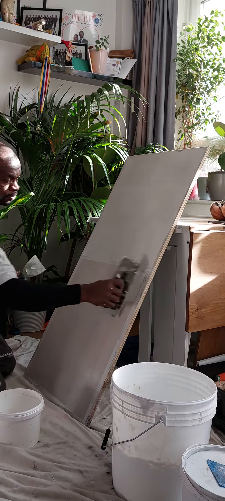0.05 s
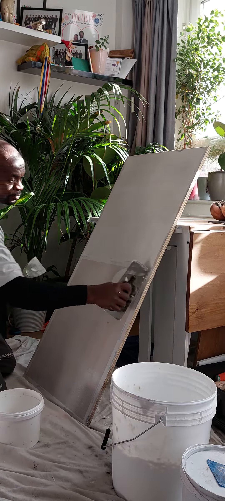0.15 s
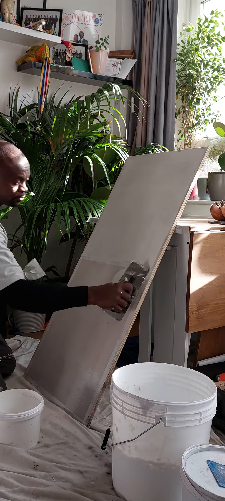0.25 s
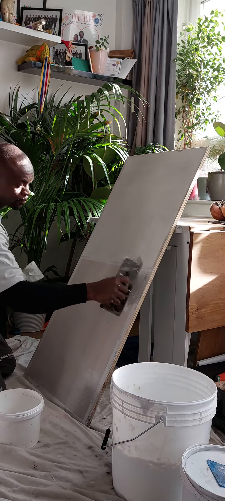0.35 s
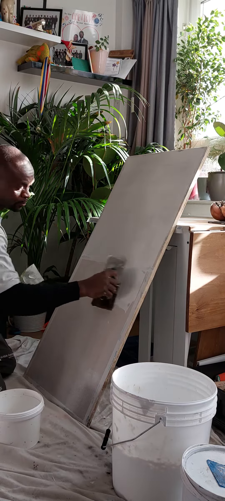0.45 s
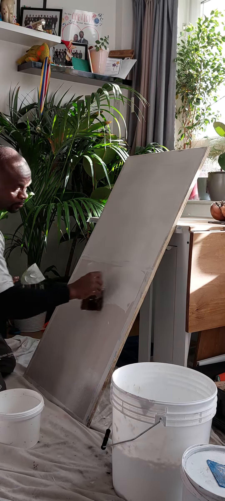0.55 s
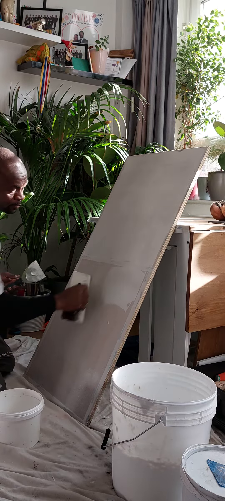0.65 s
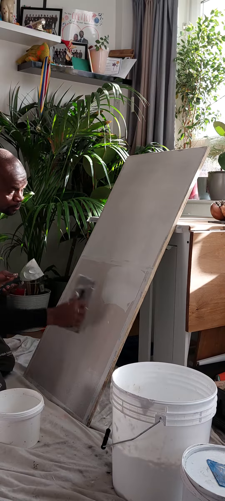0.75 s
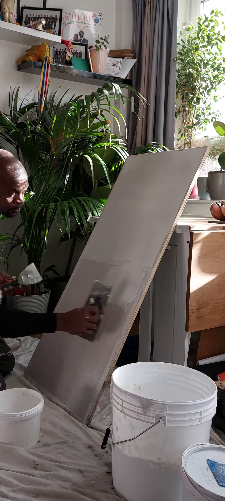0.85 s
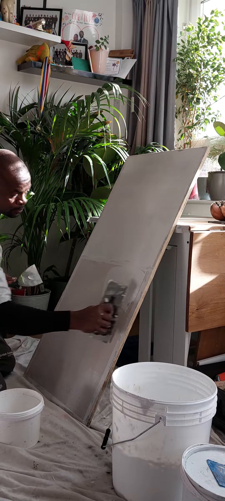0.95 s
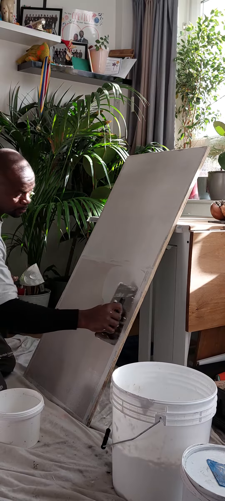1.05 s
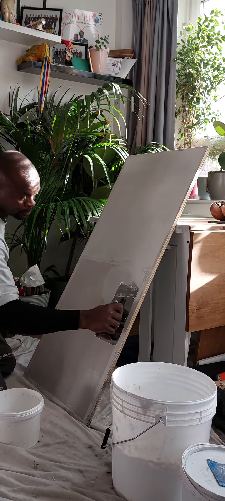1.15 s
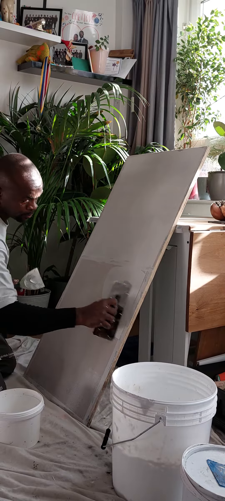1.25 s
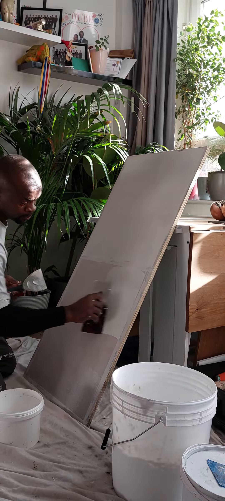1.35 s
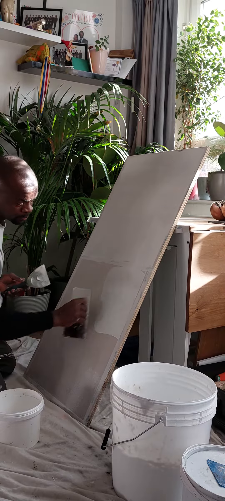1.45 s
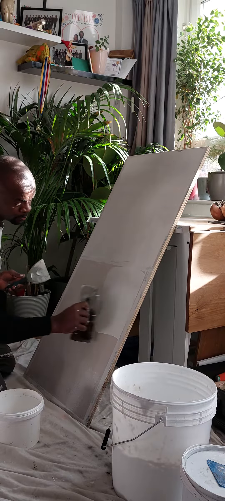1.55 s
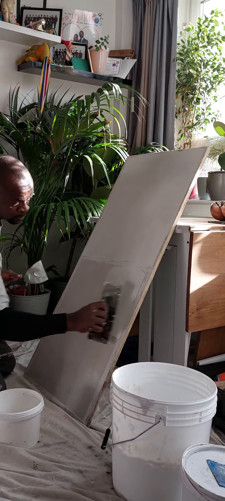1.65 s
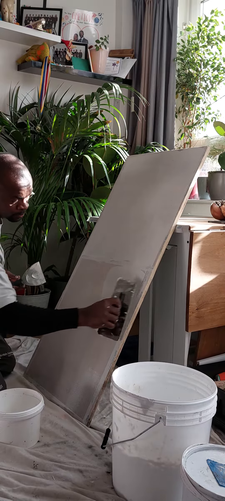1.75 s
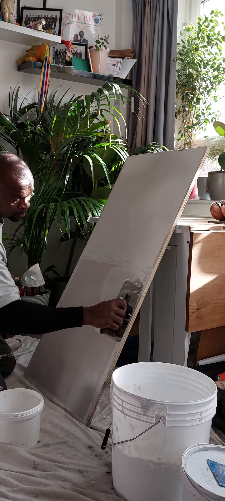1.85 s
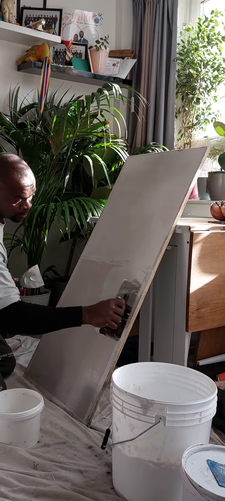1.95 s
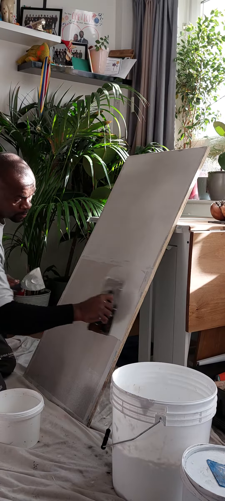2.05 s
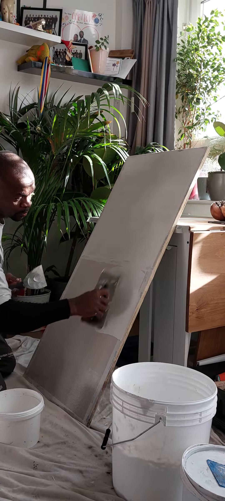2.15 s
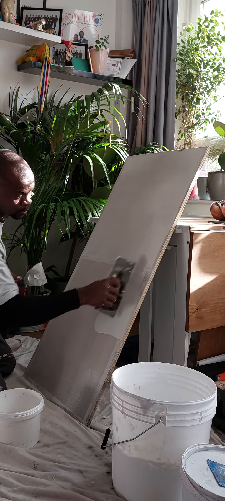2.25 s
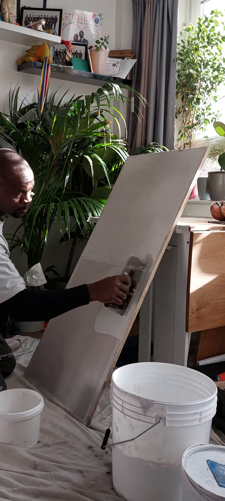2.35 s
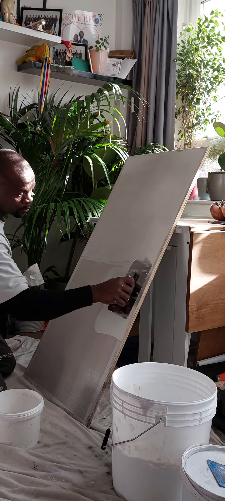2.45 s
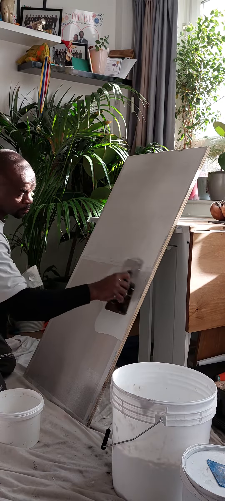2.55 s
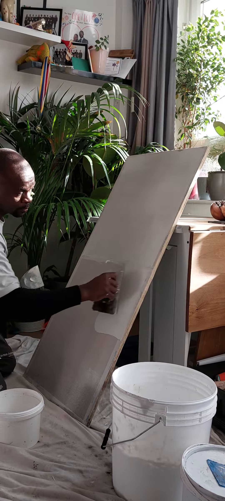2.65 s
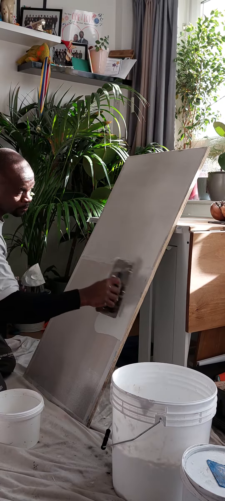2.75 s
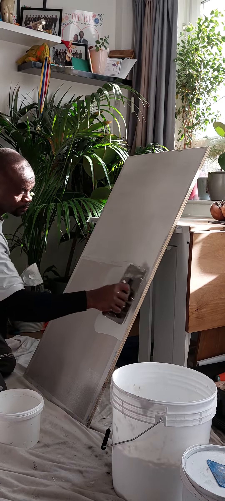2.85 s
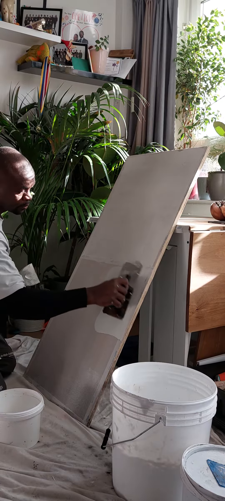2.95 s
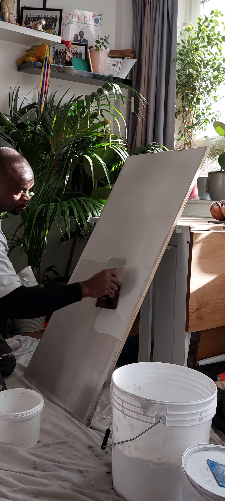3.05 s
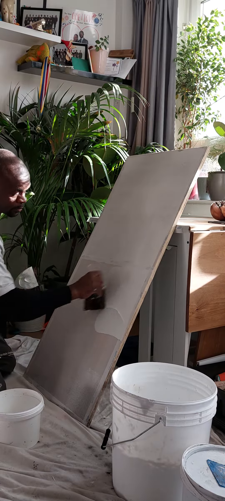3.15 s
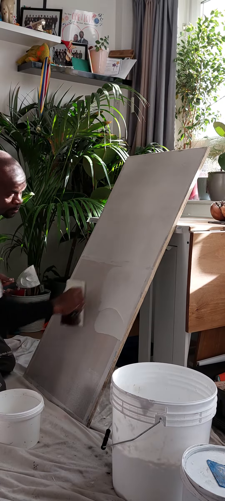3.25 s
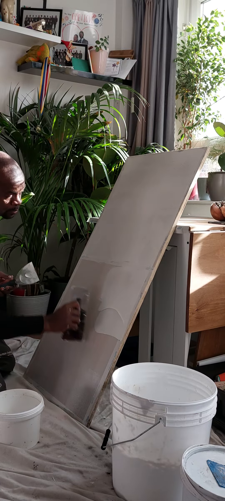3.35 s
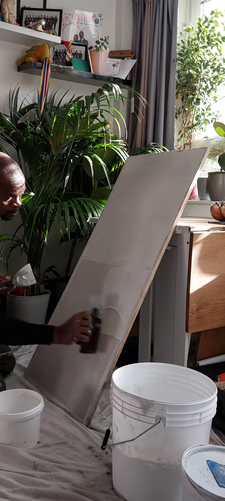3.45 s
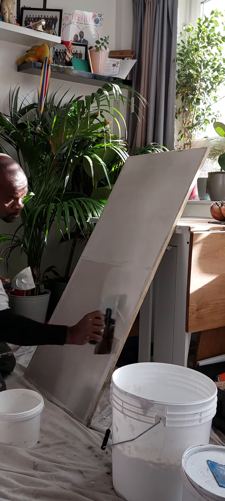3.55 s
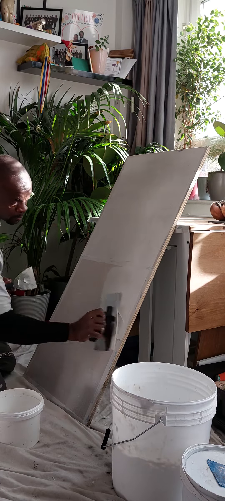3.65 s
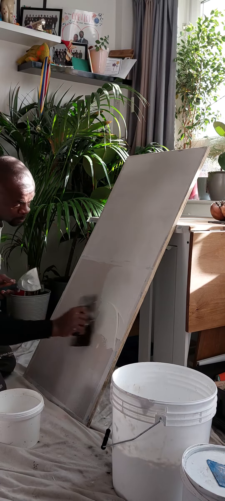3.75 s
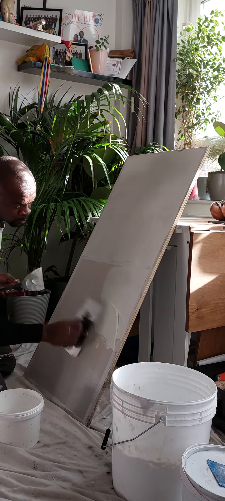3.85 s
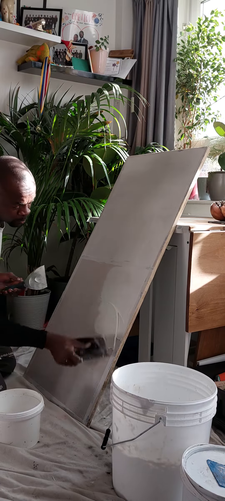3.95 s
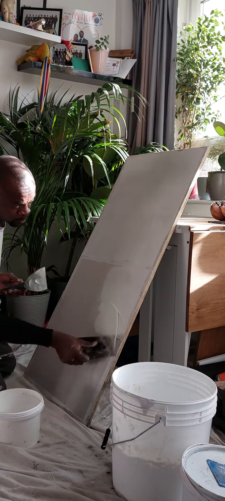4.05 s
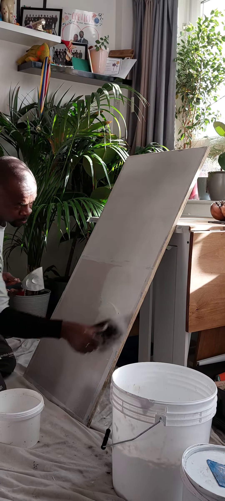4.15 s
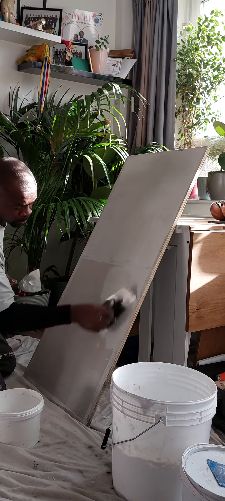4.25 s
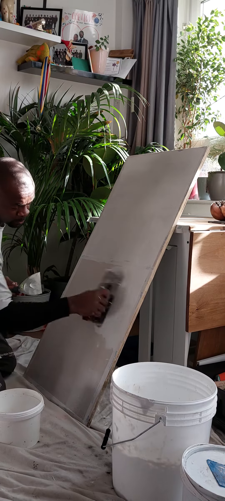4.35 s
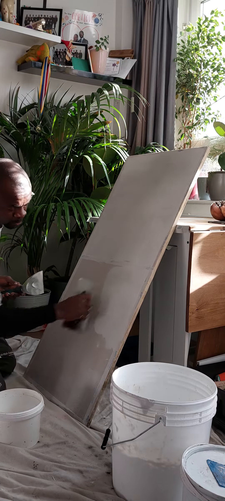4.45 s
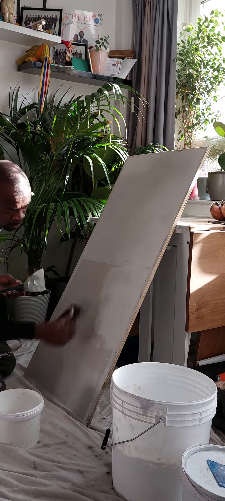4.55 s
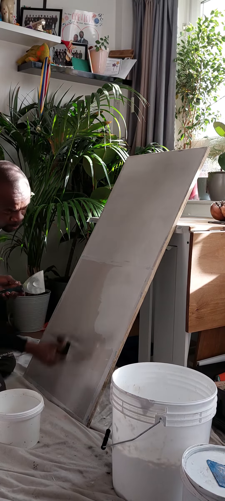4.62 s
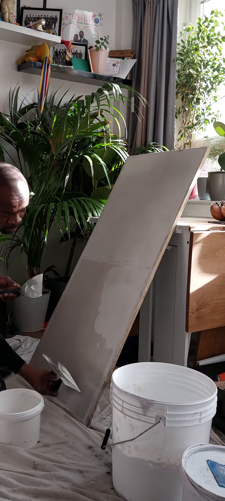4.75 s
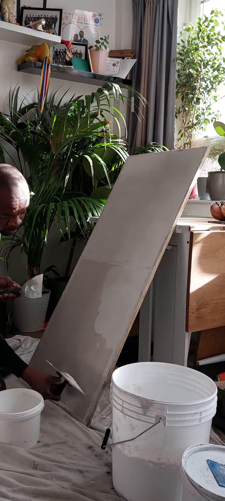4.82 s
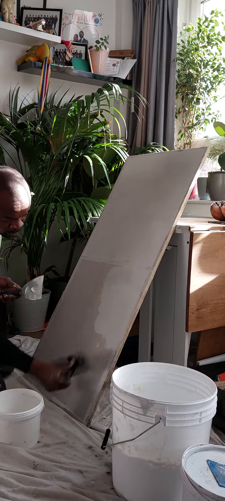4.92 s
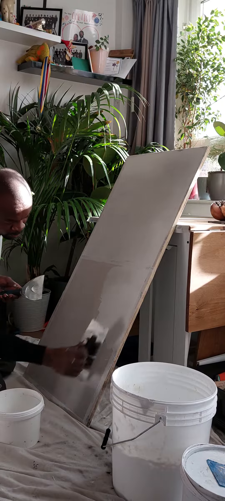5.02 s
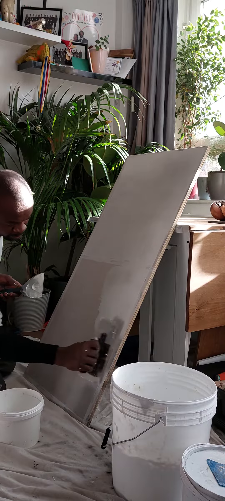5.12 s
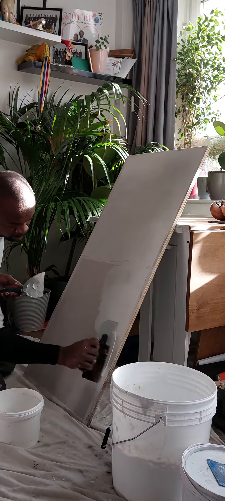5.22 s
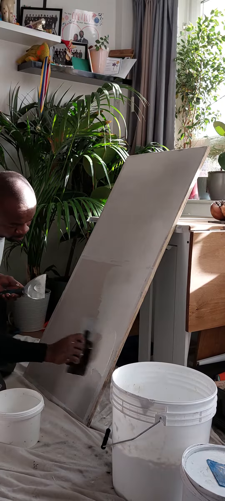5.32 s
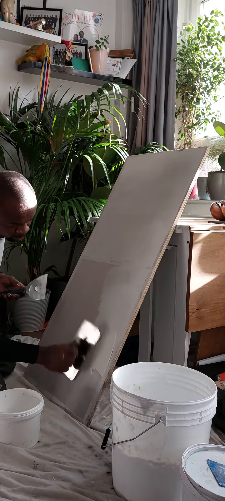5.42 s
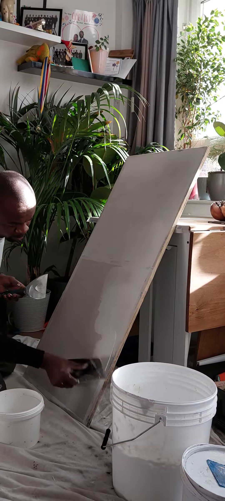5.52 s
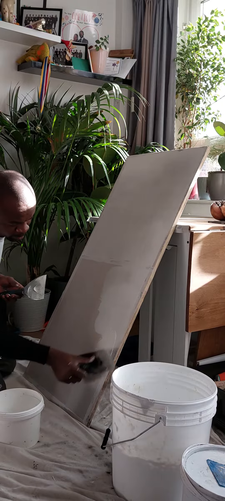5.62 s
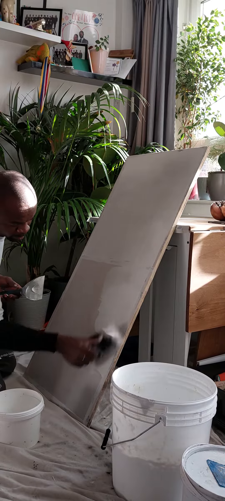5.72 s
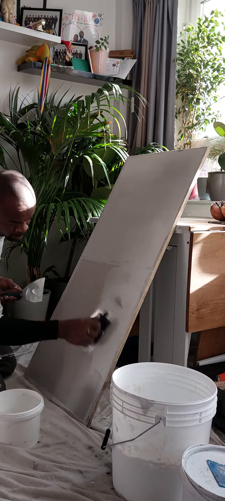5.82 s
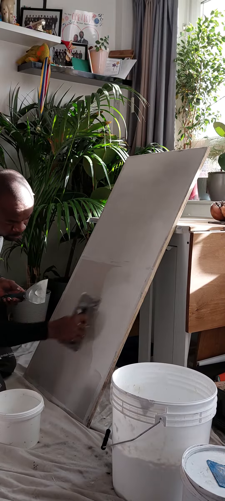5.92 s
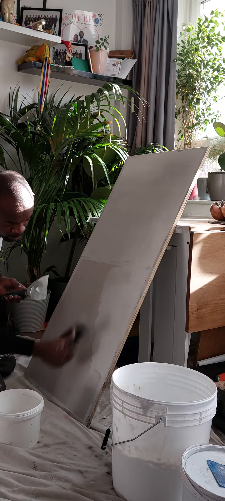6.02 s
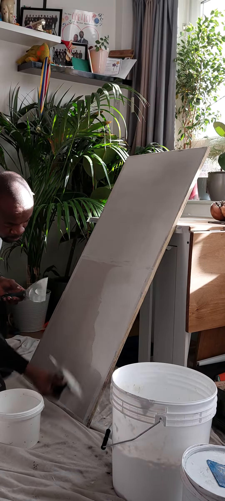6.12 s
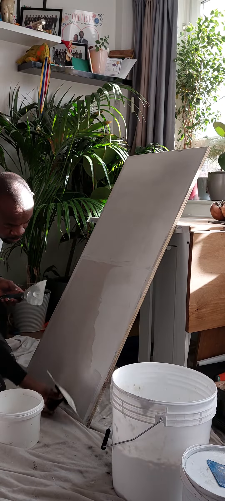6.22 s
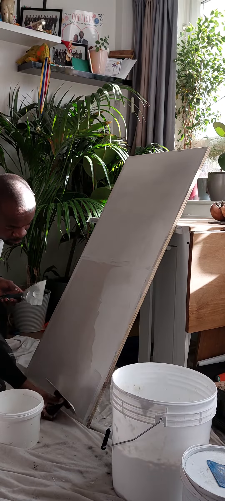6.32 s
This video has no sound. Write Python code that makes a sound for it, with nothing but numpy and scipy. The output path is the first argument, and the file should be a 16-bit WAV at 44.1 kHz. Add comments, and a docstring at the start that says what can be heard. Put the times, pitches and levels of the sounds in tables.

```python
"""A furnished room, a stereo microphone far enough from the work to hear more room than direct sound.
A sleeve rustles, then a steel trowel taps onto a leaning board and spreads thin plaster in nine strokes.
The blade hisses over the grit and chatters in tiny slips; the board booms under the hand's pressure,
and the edge judders as it lifts off. The sixth and eighth strokes are flicks that leave the steel ringing.
After the last stroke the room's short tail dies into a low rumble."""
import sys
import numpy as np
from scipy import signal
from scipy.fft import rfft, irfft
from scipy.io import wavfile
from scipy.ndimage import uniform_filter1d, map_coordinates

SR = 44100
rng = np.random.default_rng(int(sys.argv[2]) if len(sys.argv) > 2 else 0)


def output_pcm(signal):
    """Save a mono or channel-first signal as 16-bit PCM at the path in sys.argv[1].

    Samples are clipped to [-1, 1] before scaling.
    """
    pcm = np.clip(np.atleast_2d(signal).T, -1, 1) * 32767
    wavfile.write(sys.argv[1], SR, np.round(pcm).astype(np.int16))


N = 281358
TIME = np.arange(N) / SR


def amp(db):
    """Decibels to gain."""
    return 10 ** (np.asarray(db) / 20)


def unit_rms(x):
    """Scales to rms 1."""
    return x / np.sqrt(np.mean(x ** 2) + 1e-20)


def curve_at(points, hz):
    """Reads a curve on a log-frequency axis."""
    f, value = np.transpose(points)
    return np.interp(np.log(hz + 1), np.log(f), value)


def add(mix, start_s, sound):
    """Mixes a sound in at its start time."""
    part = mix[round(start_s * SR):][:len(sound)]
    part += sound[:len(part)]


def swells(rows, window=signal.windows.hann):
    """A gain curve with one smooth swell for each row of start, length and level."""
    gain = np.zeros(N)
    for start_s, length_s, db in rows:
        add(gain, start_s, amp(db) * window(round(length_s * SR)))
    return gain


def ring(x, spectrum, modes=(), size=16384):
    """Passes x through a causal body of unit energy: a broad response with resonant peaks."""
    hz = np.fft.rfftfreq(size, 1 / SR)
    peaks_db = sum(lift / (1 + ((hz - f) / width * 2) ** 2) for f, width, lift in modes)
    db = curve_at(spectrum, hz) + peaks_db
    log_gain = np.log(amp(np.r_[db, db[-2:0:-1]]))
    minimum_phase = np.exp(np.conj(signal.hilbert(log_gain)))
    response = np.fft.ifft(minimum_phase).real[:size // 2]
    return signal.oaconvolve(x, response / np.linalg.norm(response))[:N]


def wander(per_s):
    """A smooth random drift of rms 1 that changes about per_s times a second."""
    hz = np.fft.rfftfreq(N, 1 / SR)
    return unit_rms(irfft(rfft(rng.standard_normal(N)) / np.sqrt(1 + (hz / per_s) ** 4), N))


def grains(per_s, spread_db):
    """Random clicks of uneven size and either sign."""
    size = amp(spread_db * np.minimum(rng.exponential(1, N), 4))
    return unit_rms(size * rng.choice([-1, 1], N) * (rng.random(N) < per_s / SR))


def blend(a, b, share):
    """Mixes two unrelated signals, with the given share of the power from b."""
    return np.sqrt(1 - share) * a + np.sqrt(share) * b


# The room at the microphone's two ports. Each row: frequency in Hz, correlation between them.
PORT_CORRELATION = [(50, 0.71), (250, 0.79), (550, 0.52), (900, 0.18), (1500, 0.094), (3000, 0.039),
                    (16000, 0)]

def port_pair(x):
    """Makes two unrelated channels alike in the bass, as at two ports close together."""
    a, b = rfft(x)
    hz = np.fft.rfftfreq(x.shape[1], 1 / SR)
    angle = np.arccos(curve_at(PORT_CORRELATION, hz)) / 2
    mid, side = a * np.cos(angle), b * np.sin(angle)
    return irfft([mid + side, mid - side], x.shape[1])


# The still room around the microphone. Each row: frequency in Hz, relative level in dB.
ROOM_TONE = [(15, -64), (25, -32), (37, -15.5), (50, -12.5), (76, -7), (96, -8), (110, -18), (184, -25.5),
             (324, -27), (2970, -45.5), (6850, -42), (15800, -45)]

def room_tone(level_db=-67.5):
    """A low, slowly heaving rumble and a faint hiss."""
    air = np.array([ring(rng.standard_normal(N), ROOM_TONE) for _ in range(2)])
    return amp(level_db + 1.2 * wander(per_s=4)) * unit_rms(port_pair(air))


# The sleeve, barely reaching the microphone. Each row: start in seconds, length in seconds, level in dB.
RUSTLES = [(0.0, 0.24, -69), (3.63, 0.23, -63), (4.753, 0.35, -79)]
# The colour of the cloth. Each row: frequency in Hz, relative level in dB.
CLOTH = [(300, -8), (1200, -2.5), (3000, -10), (7000, -10.5), (15000, -11)]

def sleeve():
    """Cloth brushes softly as the arm swings back."""
    return ring(swells(RUSTLES) * grains(per_s=1300, spread_db=1.5), CLOTH)


# Light contact at the board. Each row: start and length in seconds, hiss and boom drive in dB.
RUBS = [(0.0, 0.0079, -56, -46.5), (0.195, 0.077, -57, -38.5), (1.1, 0.067, -66, -46),
        (1.883, .06, -56.5, -39), (2.437, 0.059, -57, -41.5), (5.193, 0.082, -77, -62.5),
        (5.535, 0.041, -65, -50), (6.33, .04, -82.5, -83)]

def rubs(chatter_over_hiss_db=8, fade_share=0.22):
    """Hiss, chatter and boom power as the blade rests or creeps on the plaster between strokes."""
    power = np.zeros((3, N))
    for start_s, length_s, hiss_db, boom_db in RUBS:
        touch = signal.windows.tukey(round(length_s * SR), fade_share)
        for layer, db in zip(power, (hiss_db, hiss_db + chatter_over_hiss_db, boom_db)):
            add(layer, start_s, (amp(db) * touch) ** 2)
    return power


def slips(per_s, jitter, spread_db):
    """Stick and slip: one kick each time the edge lets go, at an uneven pace."""
    pace = per_s * np.exp(jitter * wander(per_s))
    count = np.floor(np.cumsum(pace) / SR)
    kicks = np.diff(count, prepend=0) * amp(spread_db * rng.standard_normal(N))
    return unit_rms(kicks - uniform_filter1d(kicks, size=256))


# Broad colours right at the board, before the room. Each row: frequency in Hz, relative level in dB.
GRIT = [(300, -25), (1500, -3), (2700, -3), (3200, -5), (4600, -4), (5800, -10), (7700, -10), (8600, -15),
        (9400, -21), (10300, -13), (12200, -11.5), (15800, -12)]  # grit crushed under the edge
BLADE = [(200, -44), (500, -29.5), (750, -3.5), (1050, -2.5), (1350, -0.5), (1650, -3.5), (2100, -8.5),
         (2700, -14), (3500, -18.5), (8000, -39)]  # the steel lying on the plaster
TIPPED_BLADE = [(400, -38.5), (800, -10.5), (1150, -7), (1330, 2), (1480, -1), (1680, -14.5), (2600, -13),
                (6000, -42)]  # the steel on its edge, free of the damping plaster
FLEX = [(150, -36), (300, -7.5), (410, -12.5), (520, -1), (700, 0), (850, -2), (1200, -8.5), (2500, -26.5),
        (6000, -49.5)]  # the board's bending waves
BOOM = [(25, -31), (65, -14), (115, -6.5), (145, -9), (180, -7.5), (230, 4.5), (300, 0.5), (400, -6),
        (600, -33.5), (2000, -45)]  # the whole board drumming
# The resonances on those colours. Each row: frequency in Hz, width in Hz, lift in dB.
BLADE_MODES = [(975.6, 44, 5.6), (1233, 22, 5.7), (1330, 39, 2.4), (1488, 21, 5.6), (2092, 71, 8),
               (2310, 31, 1.9), (2645, 100, 5.2)]
FLEX_MODES = [(476, 16, 1.7), (525, 7.6, 4), (569, 36, 4.1), (662.3, 6.3, 2.3), (747, 17, 2.5)]
BOOM_MODES = [(223, 9.4, 11), (275, 7.5, 4.3)]

def scrape(hiss_db, chatter_db, boom_db):
    """Grit and slips under the moving edge drive the blade and the board."""
    bite = amp(wander(per_s=29))  # the plaster lies unevenly
    kicks = slips(per_s=280, jitter=.7, spread_db=2.5)
    sand = blend(grains(per_s=9000, spread_db=3.5), kicks, share=0.15)
    drag = blend(grains(per_s=3500, spread_db=-1.0), kicks, share=0.35) * bite * amp(chatter_db - 1.5)
    # much chatter over little hiss means a tipped blade, which rings more freely
    tipped = np.clip((chatter_db - hiss_db - 6.0) / 7, 0, .85)
    blade = blend(ring(drag, BLADE, BLADE_MODES), ring(drag, TIPPED_BLADE, BLADE_MODES), share=tipped)
    blade /= np.sqrt(tipped) + np.sqrt(1 - tipped)  # both come from one drive and add in step
    # the board bends with both the blade's chatter and the hand's pressure
    flex_db = 0.75 * chatter_db + 0.29 * boom_db - 3.5
    bending = blend(grains(per_s=2500, spread_db=1.5), kicks, share=0.16) * bite * amp(flex_db)
    flex = ring(bending, FLEX, FLEX_MODES)
    hiss = ring(sand * bite * amp(hiss_db + 2), GRIT)
    boom = ring(grains(per_s=1800, spread_db=1.5) * amp(boom_db - 5.5), BOOM, BOOM_MODES)
    return hiss + blade + flex + boom


def board_drum(force_db, hz=224.4, t60_s=0.27, waver_hz=4.0, waver_db=-1.0):
    """The board's main mode stores the push of the blade and rings on, wavering as the hand moves."""
    retained = np.exp(-2 * np.log(1000) / (t60_s * SR))
    energy = signal.lfilter([1 - retained], [1, -retained], amp(force_db) ** 2)
    turns = np.cumsum(hz + waver_hz * wander(per_s=26)) / SR
    return np.sqrt(2 * energy) * amp(waver_db * wander(per_s=34)) * np.sin(2 * np.pi * turns)


# Taps at the board as the blade lands or bites in. Each row: start in seconds, strength in dB.
LANDINGS = [(0.195, -45.5), (0.283, -39.5), (1.103, -48.5), (1.229, -47), (1.878, -36.5), (2.429, -40.5),
            (2.521, -43), (2.912, -29), (4.060, -35.5), (5.329, -55), (5.598, -45.5)]

def landings(contact_s=0.0021):
    """Steel meets wet plaster: a short, cushioned blow into blade and board."""
    t = np.arange(SR // 20) / SR
    blows = np.zeros(N)
    for start_s, db in LANDINGS:
        add(blows, start_s, amp(db) * np.exp(-t / contact_s) * rng.standard_normal(len(t)))
    edge = amp(7.0) * ring(blows, BLADE, BLADE_MODES) + amp(-8.0) * ring(blows, GRIT)
    return edge + amp(9.5) * ring(blows, FLEX, FLEX_MODES) + amp(1.0) * ring(blows, BOOM, BOOM_MODES)


# The sweeps across the board. Each row: start, time to full speed and length in seconds,
# depth of the opening swell in dB, then hiss, chatter and boom drive at full speed in dB.
STROKES = [(0.278, 0.15, 0.36, 19, -31, -23, -37.5), (1.212, 0.23, 0.25, 17, -32.5, -27, -36.5),
           (1.927, 0.22, 0.19, 19.5, -30.5, -23.5, -36.5), (2.508, 0.13, 0.14, 18.5, -33, -23.5, -37),
           (2.907, 0.2, 0.34, 16.5, -30.5, -24, -34.5), (3.716, 0.084, .082, 27, -30, -19.5, -45.5),
           (4.052, 0.13, 0.4, 16, -33, -26, -37), (5.303, 0.059, 0.07, 27, -34, -22, -47.5),
           (5.583, 0.18, .32, 23, -31.5, -26, -37)]

def strokes(bite_s=.018, linger_db_per_s=136.5):
    """Hiss, chatter and boom power as each stroke bites in, gathers speed, lifts off and rings out."""
    swell_share = (1, 1, 0.25)  # the boom depends on pressure more than on speed
    lift_db_per_s, linger_db = (327, 403, 197), (-29.5, -17, -16)
    t = np.arange(SR) / SR
    bite = np.minimum(t / bite_s, 1)  # the edge sinks into the plaster
    power = np.zeros((3, N))
    for start_s, rise_s, length_s, swell_db, *full_db in STROKES:
        slow_db = swell_db * np.maximum(1 - t / rise_s, 0) ** 2
        swell = amp(-np.outer(swell_share, slow_db))
        lifted_s = np.maximum(t - length_s, 0)
        contact = amp(-np.outer(lift_db_per_s, lifted_s))
        linger = amp(linger_db)[:, None] * amp(-linger_db_per_s * lifted_s)
        gains = amp(full_db)[:, None] * bite * swell * np.maximum(contact, linger)
        for layer, gain in zip(power, gains):
            add(layer, start_s, gain ** 2)
    return power


# Extra weight on the board. Each row: start in seconds, length in seconds, boom drive in dB.
PUSHES = [(0.49, 0.17, -29), (1.229, 0.069, -32), (1.979, 0.088, -31.5), (4.194, 0.064, -26),
          (5.704, 0.085, -32)]

def pushes():
    """Boom power as the hand leans into the board in mid-stroke."""
    return swells(PUSHES) ** 2


# The edge catches on the board, mostly late in a stroke. Each row: start and length in seconds, grip in dB.
JUDDERS = [(0.498, .04, -24), (0.601, 0.047, -21), (1.428, 0.048, -23.5), (2.062, 0.062, -30.5),
           (2.617, 0.049, -26.5), (3.218, 0.033, -16.5), (4.411, 0.04, -28.5), (5.891, 0.032, -21)]

def judder():
    """The raised edge hops over the plaster in coarse slips that shake the board."""
    grip = swells(JUDDERS, window=lambda n: signal.windows.tukey(n, .4))
    kicks = slips(per_s=190, jitter=.45, spread_db=3.0)
    hops = grip * blend(kicks, grains(per_s=1500, spread_db=4.5), share=0.61)
    board = amp(-1.0) * ring(hops, FLEX, FLEX_MODES)
    return board + amp(-0.5) * ring(hops, BLADE, BLADE_MODES) + amp(-14) * ring(hops, GRIT)


# Two quick flicks off the board. Each row: start in seconds, length in seconds, rasp in dB.
FLICKS = [(3.761, 0.05, -22), (5.339, 0.04, -30.5)]
# The blade ringing clear of the board. Each row: frequency in Hz, relative level in dB, t60 in seconds.
FREE_BLADE_MODES = [(545, -11.5, 0.38), (1412, 0, 0.27), (1510, -2, 0.17), (1750, -9, 0.25),
                    (2080, -22, .25)]

def flicks():
    """A flick of the edge rasps the steel, which sings on in the air."""
    rasp = swells(FLICKS) * grains(per_s=2500, spread_db=3.5)
    t = np.arange(SR // 2) / SR
    steel = sum(amp(db - 60 * t / t60_s) * np.sin(2 * np.pi * hz * t)
                for hz, db, t60_s in FREE_BLADE_MODES)
    return signal.oaconvolve(rasp, steel / np.linalg.norm(steel))[:N]


def direct(x, lag_s=.00003, sway_s=.00005):
    """The direct sound reaches the two ports at slightly different times as the hand sways."""
    lag = lag_s + sway_s * wander(per_s=1.5)
    return np.array([map_coordinates(x, [(TIME - lag) * SR], order=3), x])


# The furnished room's decay, heard from the microphone. Each row: frequency in Hz, t60 in seconds.
ROOM_DECAY = [(100, 0.4), (250, 0.35), (1000, 0.3), (3000, .33), (7000, .30), (15000, 0.21)]

def room_tail(first_s=.003, echoes_per_s=3500):
    """Sparse echoes of random sign, each band dying at its own speed."""
    t = np.arange(SR // 2) / SR
    signs = rng.choice([-1., 1.], (2, len(t)))
    arrivals = (rng.random((2, len(t))) < echoes_per_s / SR) * (t > first_s)
    hz, age_s, bands = signal.stft(port_pair(signs * arrivals), SR, nperseg=256)
    decay = amp(-60 * age_s / curve_at(ROOM_DECAY, hz)[:, None])
    echoes = signal.istft(bands * decay, SR, nperseg=256)[1]
    return echoes / np.sqrt(np.sum(echoes ** 2) / 2)


def room(x, rounds_per_s=2.6, tails=7):
    """The echoes change as the trowel travels: several tails take turns, each fading into the next."""
    turn = (rounds_per_s * tails * TIME + np.arange(tails)[:, None]) % tails
    feeds = x * np.sin(np.pi * np.minimum(turn, 2) / 2)
    return sum(signal.oaconvolve(feed[None], room_tail(), axes=1)[:, :N] for feed in feeds)


def scene():
    """At the microphone: the trowel, direct and by way of the room, over the drumming board."""
    power = rubs() + strokes()
    power[2] += pushes()
    hiss_db, chatter_db, boom_db = 10 * np.log10(power + 1e-12)
    trowel = scrape(hiss_db, chatter_db, boom_db) + judder() + landings() + flicks() + sleeve()
    board = board_drum(boom_db - 3) * amp([[-1], [1]])  # a little to the right
    return amp(-5.0) * direct(trowel) + amp(1.01) * room(trowel) + board + room_tone()


# The unequal colour of the microphone's ports. Each row: frequency in Hz, left minus right in dB.
PORT_BALANCE = [(100, 1.5), (450, -1.7), (1400, 0.75), (2800, 1), (3500, -0.8), (4800, -1), (6000, 4.5),
                (7300, -0.5), (8200, 6), (9500, 0), (11900, -4), (13500, -4.5), (15800, 3)]

def record(dry):
    """The microphone colours each side in its own way and cuts off the highest treble."""
    lean_db = curve_at(PORT_BALANCE, np.fft.rfftfreq(N, 1 / SR)) / 2
    coloured = irfft(rfft(dry) * amp([lean_db, -lean_db]), N)
    lowpass = signal.firwin(511, cutoff=15880, window=("kaiser", 9), fs=SR)
    return signal.oaconvolve(coloured, lowpass[None], "same")


dry = scene()
out = record(dry)
output_pcm(out)
```